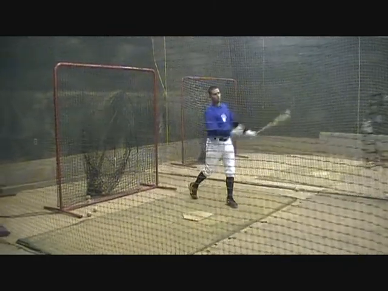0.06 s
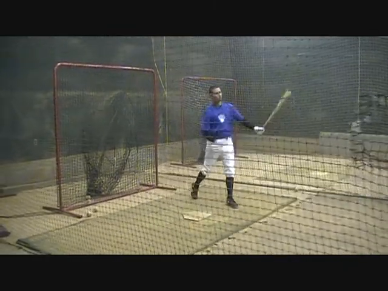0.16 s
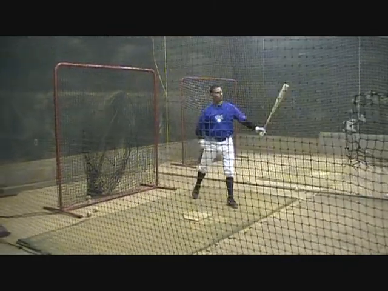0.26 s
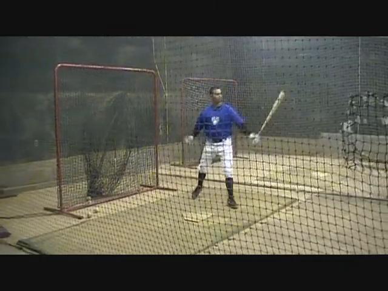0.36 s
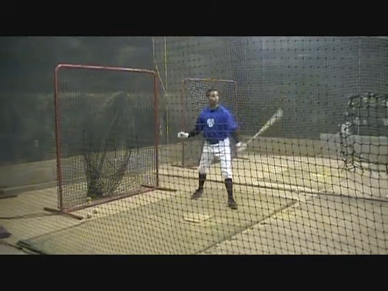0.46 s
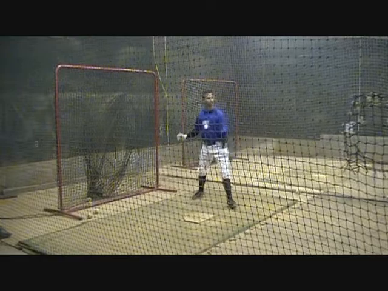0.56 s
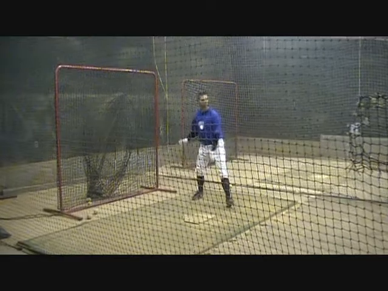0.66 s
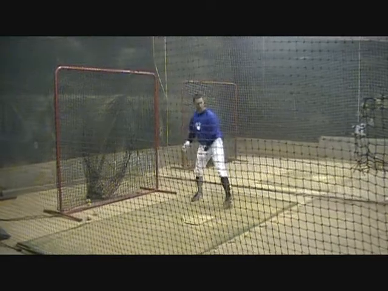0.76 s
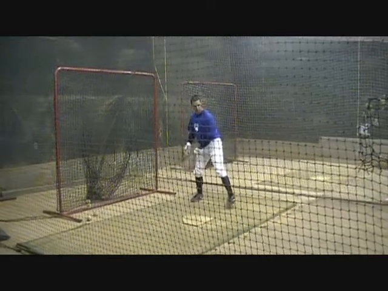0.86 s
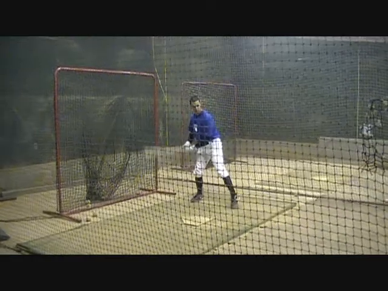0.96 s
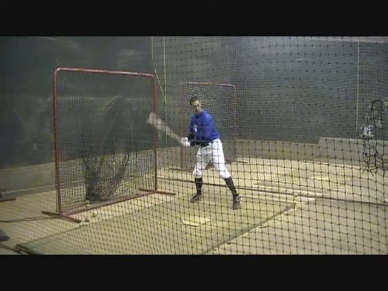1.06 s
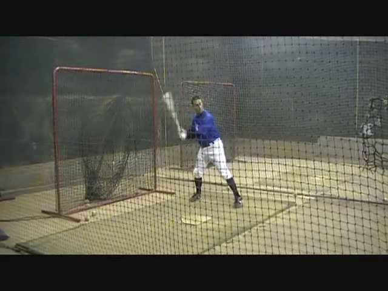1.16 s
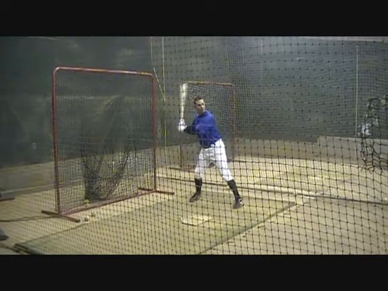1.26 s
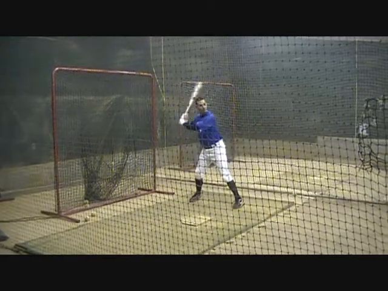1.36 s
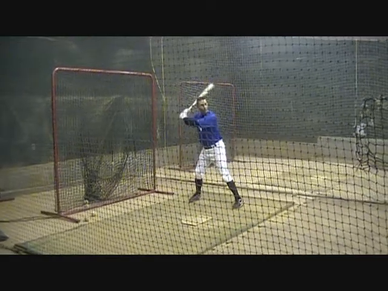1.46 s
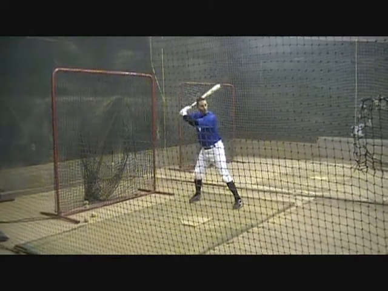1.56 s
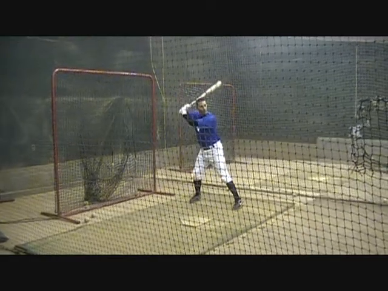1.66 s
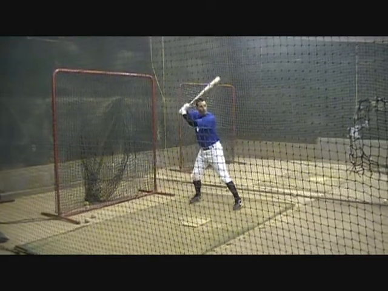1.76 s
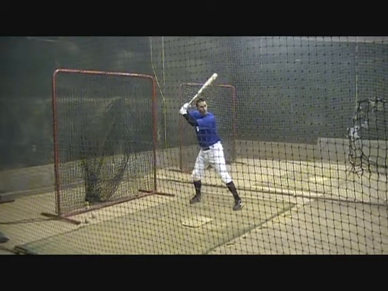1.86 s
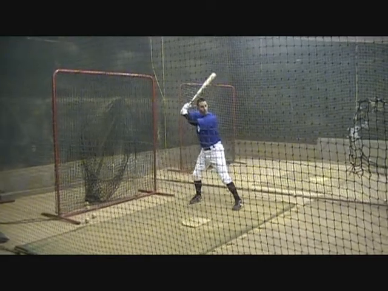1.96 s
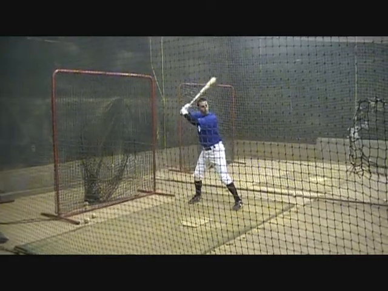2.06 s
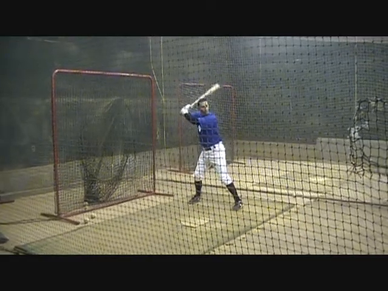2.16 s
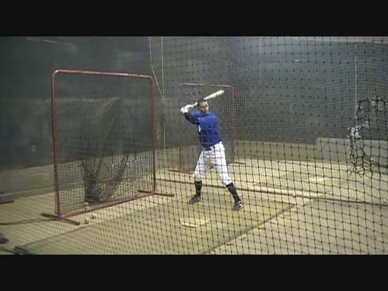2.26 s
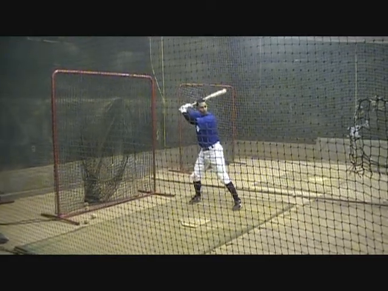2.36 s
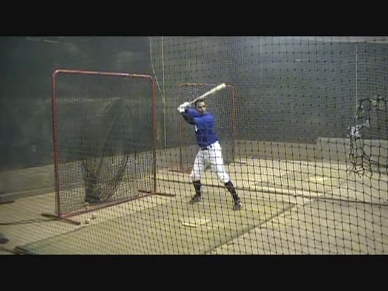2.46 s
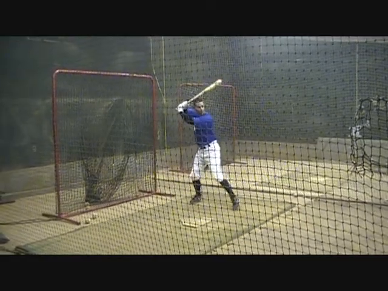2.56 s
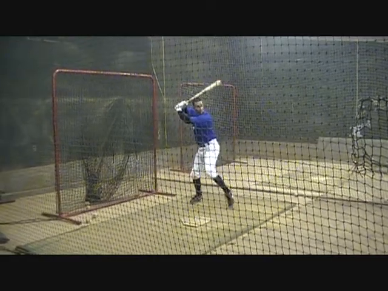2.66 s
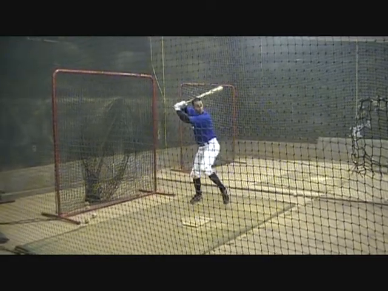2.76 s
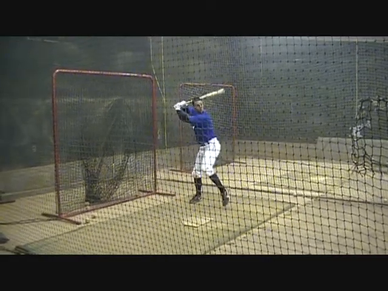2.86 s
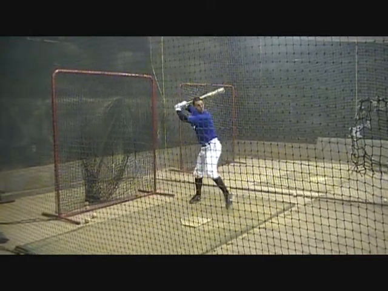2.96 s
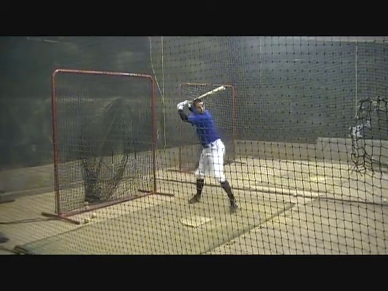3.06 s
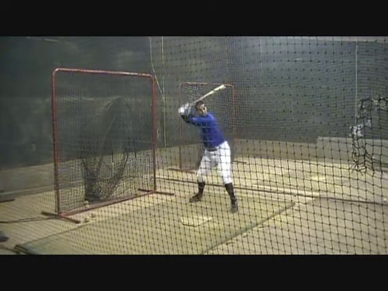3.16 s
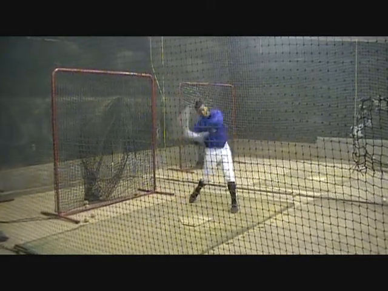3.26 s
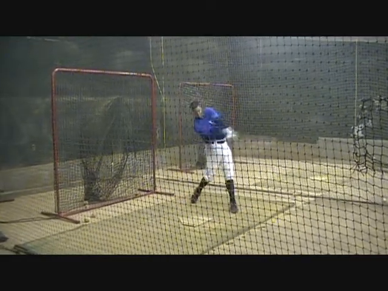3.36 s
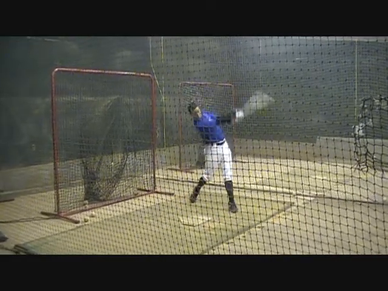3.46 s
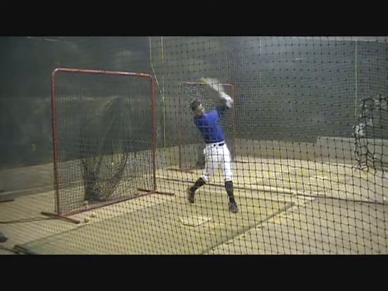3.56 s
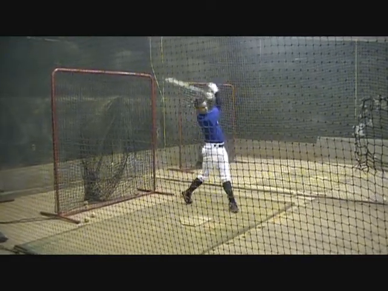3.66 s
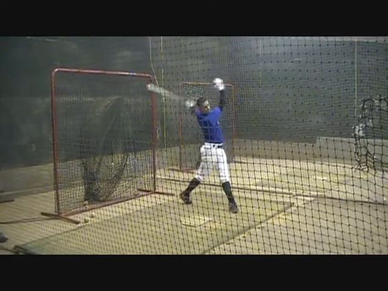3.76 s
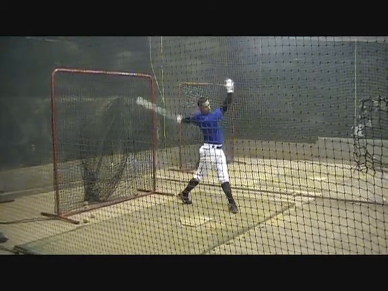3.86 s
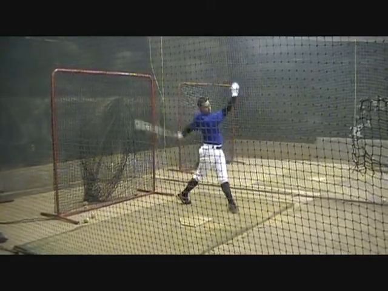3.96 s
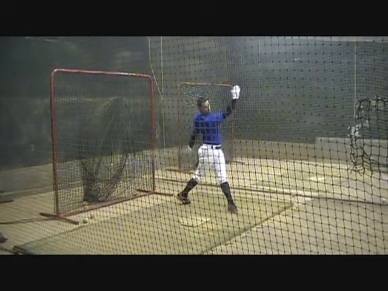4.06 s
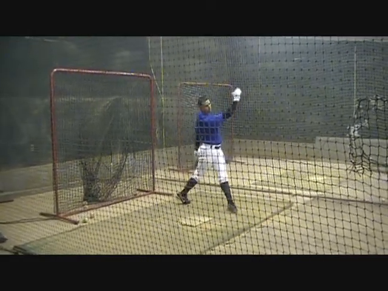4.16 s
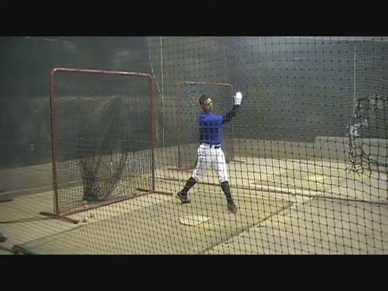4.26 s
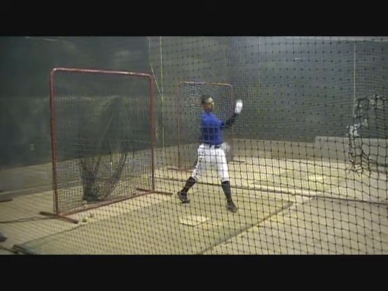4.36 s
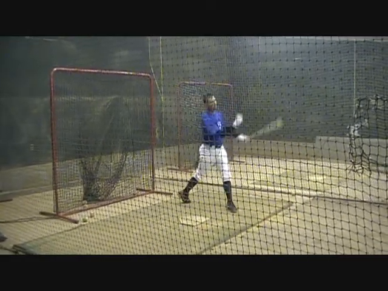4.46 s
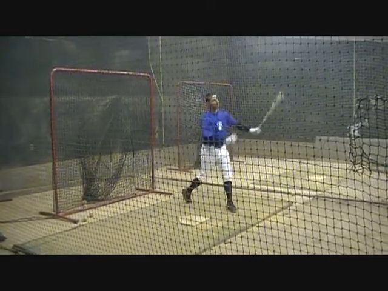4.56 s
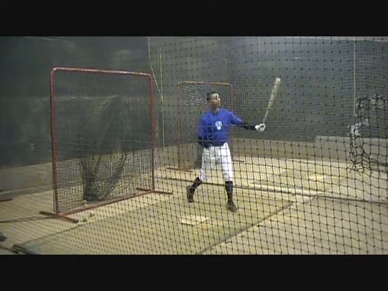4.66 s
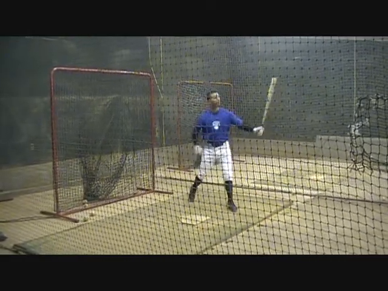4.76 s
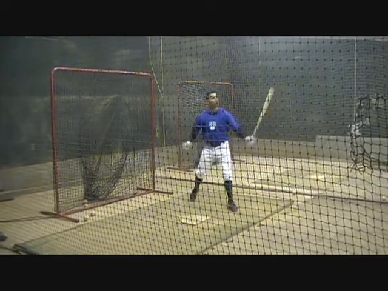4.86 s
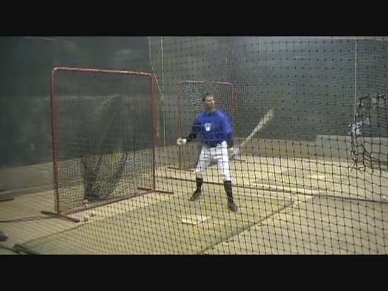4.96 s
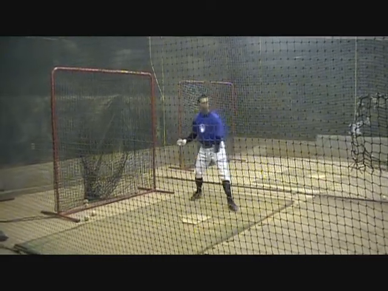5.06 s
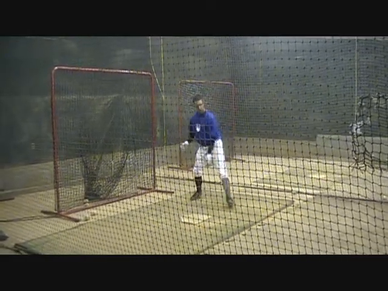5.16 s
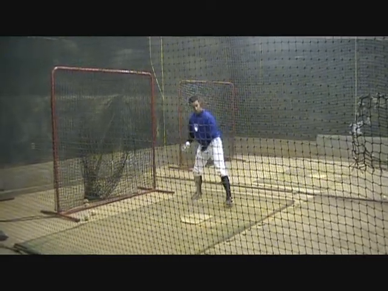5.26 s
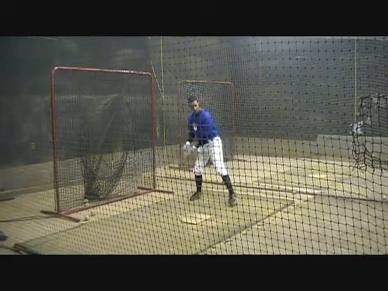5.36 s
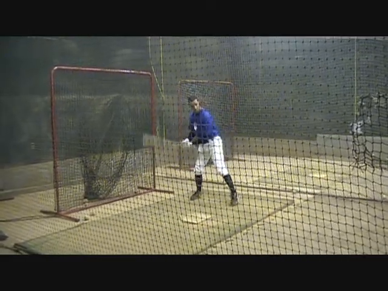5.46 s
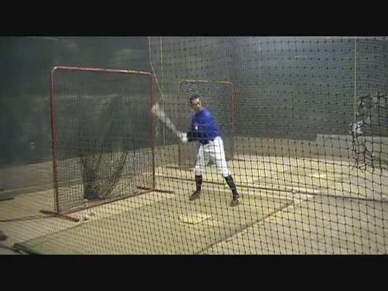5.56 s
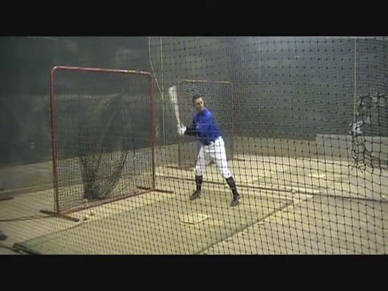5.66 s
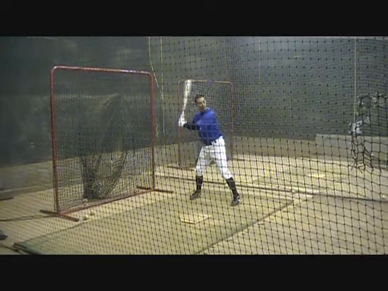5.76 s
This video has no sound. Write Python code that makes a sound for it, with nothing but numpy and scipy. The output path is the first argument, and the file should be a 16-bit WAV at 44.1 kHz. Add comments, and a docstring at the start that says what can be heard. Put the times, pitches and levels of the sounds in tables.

```python
"""In a large bare hall with buzzing lamps, an earlier bat crack is dying away as nets rustle and tick.
A ball knocks softly; later a stride scuffs and the wooden bat cracks: a blow rings the modes of its wood.
The camera's gain plunges, the sound clips, and the gain climbs back, so the long tail swells before it fades.
Nets rustle on (shaped hiss), the ball bounces (damped tones) and hooks jingle (random knocks ring notes).
One microphone hears it all."""
import sys
import numpy as np
from scipy import signal
from scipy.io import wavfile
from scipy.ndimage import uniform_filter1d

SR = 44100
rng = np.random.default_rng(int(sys.argv[2]) if len(sys.argv) > 2 else 0)


def pcm_store(signal):
    """Save signal as 16-bit PCM."""
    levels = np.round(np.clip(np.atleast_2d(signal), -1, 1) * 32767)
    wavfile.write(sys.argv[1], SR, levels.astype(np.int16).T)


N = 255764
TIME = np.arange(N) / SR  # s


def gain_of(db):
    """Turns decibels into a factor for the amplitude."""
    return 10 ** (np.asarray(db) / 20)


def evened(x):
    """Scales a signal to an rms of 1."""
    return x / np.sqrt(np.mean(x ** 2) + 1e-20)


def read(points, hz, column=1):
    """Reads a table between its points, in straight lines over log frequency."""
    table = np.transpose(points)
    return np.interp(np.log(hz + 1), np.log(table[0] + 1), table[column])


def add(mix, s, sound):
    """Mixes a sound in at s seconds, which may lie before the start."""
    at = round(s * SR)
    sound = sound[max(-at, 0):]
    part = mix[max(at, 0):][:len(sound)]
    part += sound[:len(part)]


def swells(rows):
    """Power of each movement: it climbs 20 dB in its rise time and drops 20 dB in its fall time."""
    s, db, rise, fall = np.transpose(rows)[:4, :, None]
    late = TIME - s
    below_peak_db = 20 * np.where(late < 0, -late / rise, late / fall)
    return gain_of(db - below_peak_db) ** 2


def hiss(colour, patchy_db, flicker_db, tilt=0 * TIME):
    """Noise from random short-time spectra, with drifting patches, a common flicker and a moving tilt."""
    frames, hz = N // 128 + 5, np.fft.rfftfreq(512, 1 / SR)
    real, imaginary, patches = rng.standard_normal((frames, 257, 3)).T
    # smoothing over neighbouring pitches and moments makes the patches
    patches = uniform_filter1d(patches, size=8, axis=0)
    patches = evened(uniform_filter1d(patches, size=20, axis=1))
    flicker = evened(uniform_filter1d(rng.standard_normal(frames), size=3))
    octaves = np.log2(np.maximum(hz, 2000) / 7000)[:, None]  # the tilt pivots at 7 kHz, flat below 2 kHz
    tilt_db = octaves * np.interp(np.arange(frames) * 128 / SR, TIME, tilt)
    level_db = read(colour, hz)[:, None] + tilt_db + patchy_db * patches + flicker_db * flicker
    spectra = (real + 1j * imaginary) * gain_of(level_db)
    return evened(signal.istft(spectra, nperseg=512, noverlap=384)[1][:N])


def ring(hz, t60, size):
    """One damped tone of size samples, which falls 60 dB in t60 seconds."""
    t = np.arange(size) / SR
    return np.sin(2 * np.pi * hz * t) * gain_of(-60 * t / t60)


# how the bare hall echoes at each pitch: (frequency [Hz], time to fall 60 dB [s], starting level [dB])
HALL_DECAY = [(146, 1.65, 6), (373, 3.18, 3), (930, 2.483, 9), (2260, 2.2, 5.5), (4270, 1.836, 14),
              (7760, 0.73, 15.5), (14000, 0.36, 10)]


def hall(build_s, seconds):
    """Dense reflections, made from noise, that build up and then die away band by band."""
    hz, t, spectra = signal.stft(rng.standard_normal(seconds * SR), SR, nperseg=256)
    start_db = read(HALL_DECAY, hz, column=2)[:, None]
    t60 = read(HALL_DECAY, hz)[:, None]
    tail = signal.istft(spectra * gain_of(start_db - 60 * t / t60), SR, nperseg=256)[1]
    tail *= 1 - np.exp(-np.arange(len(tail)) / (SR * build_s))
    return tail / np.sqrt(SR / 10)


def echoed(pulse, echoes, tail, small_hz):
    """The direct sound, single early echoes and the tail; a small body gives off little bass."""
    path = tail.copy()
    path[0] = 1  # the direct sound
    for s, db in echoes:
        path[round(s * SR)] += gain_of(db)
    thin = signal.lfilter(*signal.butter(2, small_hz, "high", fs=SR), pulse)
    return signal.fftconvolve(thin, path)


# colour of the steady air noise: (frequency [Hz], relative level [dB per Hz])
AIR_COLOUR = [(20, -32), (60, -5), (150, -3), (300, -1), (600, -1), (1200, -1.5), (2000, -3), (3000, -8),
              (6000, -17), (10000, -14), (12500, -25), (15000, -23.5)]


def air():
    """A steady soft hiss that barely flickers, at -52 dB rms."""
    return gain_of(-52) * hiss(AIR_COLOUR, patchy_db=.5, flicker_db=.2)


# overtones of the lamps: (multiple of the buzz frequency [-], level before wavering [dB rms])
LAMP_OVERTONES = [(3, -65.5), (4, -58.5), (5, -64.5), (6, -66), (7, -60), (9, -60), (11, -64.5), (15, -71),
                  (16, -59), (17, -72.5), (18, -62.5), (20, -73), (24, -69), (28, -70)]
BUZZ_HZ = 120  # twice the mains frequency


def lamps():
    """Overtones of the mains buzz, each wavering slowly in level."""
    multiple, db = np.transpose(LAMP_OVERTONES)[:, :, None]
    start, rate, lag = rng.random((len(LAMP_OVERTONES), 3)).T[:, :, None]
    waver_hz = 0.56 + 1.55 * rate
    waver_db = 2.3 * np.sin(2 * np.pi * (waver_hz * TIME + lag))
    tones = np.sin(2 * np.pi * (BUZZ_HZ * multiple * TIME + start))
    return (np.sqrt(2) * gain_of(db + waver_db) * tones).sum(0)


# nets and clothes rustling, one row a movement; rise and fall span 20 dB:
# (time of the peak [s], level [dB], rise [s], fall [s], brightness [dB per octave])
RUSTLE_MOVES = [(0.05, -50.5, 0.75, 0.37, -5), (0.33, -53.5, 0.4, .4, 12), (0.465, -40, 0.027, 0.31, -2),
                (0.625, -50.5, .015, 0.26, 8), (0.795, -52, .02, 0.78, 3.5), (2.16, -54, 0.43, .35, 4),
                (2.722, -47.5, 0.12, 0.2, 3.5), (2.97, -43.5, 0.45, 0.72, 4.5), (3.32, -52, 0.19, .6, 14),
                (3.62, -10.5, 0.12, 0.09, 5), (3.785, -4.5, 0.095, 0.26, 5.5),
                (3.9, -10.5, 0.28, 0.36, -1.5), (4.1, -23, 0.23, 0.46, -7.5),
                (4.49, -30.5, 0.11, 0.41, 1.5), (4.91, -41, 0.046, 0.71, -2),
                (5.24, -43.5, 0.11, 0.26, 0.5)]
# colour of the rustle before brightening: (frequency [Hz], relative level [dB per Hz])
NET_COLOUR = [(1470, -35), (2500, -1.5), (3370, 1.5), (4160, -1), (5410, 0), (8870, -4), (10100, -8.5),
              (12100, -13.5), (15000, -34)]


def rustle():
    """Rubbing cloth and net hiss in overlapping swells; the loudest one sets the brightness."""
    power = swells(RUSTLE_MOVES)
    total = power.sum(0)
    tilt = np.transpose(RUSTLE_MOVES)[-1] @ power / (total + 1e-30)
    return np.sqrt(total) * hiss(NET_COLOUR, patchy_db=1.37, flicker_db=0.77, tilt=tilt)


# the stride over the mat, the foot planting and a short swell of dull hiss rising just before the crack;
# rise and fall span 20 dB: (time of the peak [s], level [dB], rise [s], fall [s])
STRIDE_MOVES = [(2.97, -42, 0.23, 0.6), (3.256, -38.5, 0.031, 0.042), (3.4, -41.5, 0.26, .05),
                (3.443, -25, 0.026, .002)]
# colour of the stride: (frequency [Hz], relative level [dB per Hz])
MAT_COLOUR = [(59, -49.5), (100, -12), (176, -7.5), (349, -1.5), (452, -6), (604, 0), (1220, -6),
              (2150, -5.5), (6000, -22), (7800, -36), (13200, -120)]


def stride():
    """Steps and a last short rise are swells of a duller, patchier hiss."""
    loudness = np.sqrt(swells(STRIDE_MOVES).sum(0))
    return loudness * hiss(MAT_COLOUR, patchy_db=2.0, flicker_db=-0.5)


def jingle(notes, shakes, ring_s):
    """Small steel hooks rattle densely: random knocks ring each note as a close pair."""
    out = np.zeros(N)
    for hz, db in notes:
        knocks = (rng.random(N) < 250 / SR) * rng.standard_normal(N)  # about 250 a second
        partner = ring(hz * rng.uniform(1.002, 1.008), ring_s, size=9000)
        pair = ring(hz, ring_s, size=9000) + .3 * partner
        out += gain_of(db) * evened(signal.oaconvolve(knocks, pair)[:N])
    return out * np.sqrt(swells(shakes).sum(0))


# notes of the hooks: (frequency [Hz], level before the shake level is added [dB])
HOOK_NOTES = [(5346, -53.5), (5830, -58), (6632, -56.5), (7494, -64), (9249, -57), (9873, -58),
              (10314, -58), (11940, -62)]
# shakes of the hooks; rise and fall span 20 dB: (time of the peak [s], level [dB], rise [s], fall [s])
HOOK_SHAKES = [(5.042, 6, 0.15, 0.45), (5.28, 1, .4, 0.66), (5.45, -5, 0.24, 0.27)]


def hooks():
    """Hooks whose notes ring on for a fifth of a second."""
    return jingle(HOOK_NOTES, HOOK_SHAKES, ring_s=.2)


# notes of the small hooks: (frequency [Hz], level before the shake level is added [dB])
SMALL_HOOK_NOTES = [(8269, -61), (8845, -51), (10018, -60.5), (10487, -47), (10977, -54)]
# shakes of the small hooks; rise and fall span 20 dB: (time of the peak [s], level [dB], rise [s], fall [s])
SMALL_HOOK_SHAKES = [(4.318, -1, 0.033, 0.053), (4.371, 6, .04, .06), (4.49, 10, .07, 0.077),
                     (4.55, 0, 0.056, .15)]


def small_hooks():
    """Small hooks whose notes die sooner, in short shakes."""
    return jingle(SMALL_HOOK_NOTES, SMALL_HOOK_SHAKES, ring_s=.04)


# knots of the net snapping tight: (time [s], level [dB], pitch [Hz])
KNOT_SNAPS = [(0.2994, -34, 4100), (0.445, -21, 4770), (0.4577, -18.5, 7060), (0.4794, -28, 7000),
              (0.4855, -26, 4030), (0.626, -29, 8200), (0.7945, -31, 8500), (0.819, -35, 4670),
              (3.5819, 20, 5030), (4.4374, -8.5, 4400), (4.741, -26, 7000)]


def ticks():
    """A tightening knot gives a tiny broad snap with a short fizz of noise behind."""
    out, t = np.zeros(N), np.arange(3000) / SR
    for s, db, hz in KNOT_SNAPS:
        snap = ring(hz, .0012, size=3000)
        fizz = np.convolve(rng.standard_normal(3000), snap[:40], "same")
        trail = gain_of(-17.5 - 60 * t / 0.042) * fizz
        add(out, s, gain_of(db) * (snap + trail))
    return signal.lfilter(*signal.butter(2, 1000, "high", fs=SR), out)


# thuds of the ball and feet on bat, mats and boards: (time [s], level [dB], pitch [Hz], hall share [dB])
THUDS = [(0.459, -12, 790, -1.5), (.455, -28, 236, 2.5), (3.252, -21, 850, -10), (3.4434, -1.5, 140, -31),
         (3.619, -16, 837, -2), (3.73, -8.5, 298, 4.5), (4.19, -6, 375, 2.5), (4.914, -11.5, 384, 6),
         (5.18, -19, 435, 3.5), (5.267, -4.5, 710, 3.5), (5.404, -14, 643, 5.5), (5.489, -14.5, 524, 7.5),
         (5.665, -8.5, 666, 0)]
# early echoes of each thud: (delay [s], level against the direct sound [dB])
THUD_ECHOES = [(.0113, -3), (.0188, -3), (.0262, -7), (.0345, -6), (.042, -10)]


def bounces():
    """Dull knocks die within a few cycles; the soft ball takes a fifth of a cycle to press in."""
    out, t = np.zeros(N), np.arange(2000) / SR
    for s, db, hz, wet_db in THUDS:
        knock = ring(hz, 3.5 / hz, size=2000)
        knock += gain_of(-6) * ring(2.4 * hz, 2.5 / hz, size=2000)
        knock *= 1 - np.exp(-(5 * hz * t) ** 2)  # the soft start
        room = hall(build_s=.035, seconds=2)
        # the padded cage shortens the tail
        room *= gain_of(wet_db - 60 * np.arange(len(room)) / (SR * 3.5))
        add(out, s, gain_of(db) * echoed(knock, THUD_ECHOES, room, small_hz=0.78 * hz))
    return out


# blows of the bat, the first before the start: (time [s], level [dB], tilt over the modes [dB per octave])
BLOWS = [(-1.1, 1, -0.5), (3.4442, 0, 0.07)]
# bending modes of the wood: (frequency [Hz], level before the tilt [dB], time to fall 60 dB [s])
WOOD_MODES = [(703, 14.5, 0.0065), (1130, 17.5, 0.01), (1650, 19, 0.01), (2284, 21, 0.005),
              (3180, 18, 0.0027), (4480, 16.5, 0.0018), (5900, 18, 0.0008), (8900, 22, 0.001),
              (12100, 25.5, 0.00028)]
# echoes off floor, screen and walls: (delay [s], level against the direct sound [dB])
CRACK_ECHOES = [(.0014, 2), (.0029, -5), (.0084, 1), (.012, -4), (.0205, 1), (.0245, -2), (.029, -7),
                (.036, -5), (.04, -7), (.054, -8)]
NEAR_DB, NEAR_S = 9, 0.041  # walls close by thicken the first reflections: level against the hall, decay time


def bat():
    """A short hard blow rings the bending modes of the wood; the top ones are a mere snap."""
    out = np.zeros(N)
    for s, db, tilt in BLOWS:
        wood = np.zeros(2000)
        for k, (hz, mode_db, t60) in enumerate(WOOD_MODES):
            direction = (-1) ** k  # neighbouring modes start in opposite directions
            mode_gain = gain_of(mode_db + tilt * np.log2(hz / 1100))
            wood += direction * mode_gain * ring(hz, t60, size=2000)
        room = gain_of(1) * hall(build_s=.015, seconds=4)
        room *= 1 + gain_of(NEAR_DB) * np.exp(-np.arange(len(room)) / (SR * NEAR_S))
        add(out, s, gain_of(db) * echoed(wood, CRACK_ECHOES, room, small_hz=417))
    return out


def scene():
    """Adds all the sources; one microphone feeds both channels."""
    background = air() + lamps() + rustle() + stride()
    mono = background + hooks() + small_hooks() + ticks() + bounces() + bat()
    return np.array([mono, mono])


def record(dry):
    """Gain control that drops within milliseconds and climbs back steadily, clipping, bass cut, band limit."""
    keep = np.exp(-1 / (SR * 0.0048))  # power averaged over about 4.8 ms
    power = signal.lfilter([1 - keep], [1, -keep], dry[0] ** 2)
    power_db = 10 * np.log10(power + 1e-12)
    # the held level follows each rise at once but sinks no faster than 52 dB a second
    sink_db = 52 * TIME
    held_db = np.maximum.accumulate(power_db + sink_db) - sink_db
    over_db = np.maximum(held_db + 16.5, 0)  # above a threshold of -16.5 dB
    quick = np.exp(-1 / (SR * 0.00068))  # the gain moves within about 0.7 ms
    cut_db = 1.118 * signal.lfilter([1 - quick], [1, -quick], over_db)
    clipped = np.clip(dry / gain_of(cut_db), -.95, .95)
    thinned = signal.lfilter(*signal.butter(2, 60, "high", fs=SR), clipped)
    band_limit = signal.firwin(255, 15200, window=("kaiser", 9), fs=SR)  # little passes above 15.2 kHz
    return signal.oaconvolve(thinned, band_limit[None], "same")


dry = scene()
out = record(dry)
pcm_store(out)
```